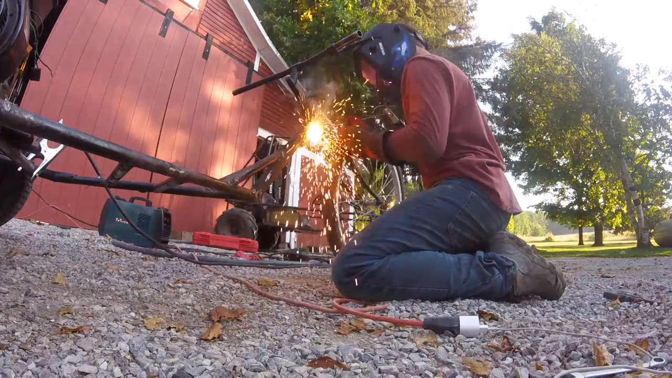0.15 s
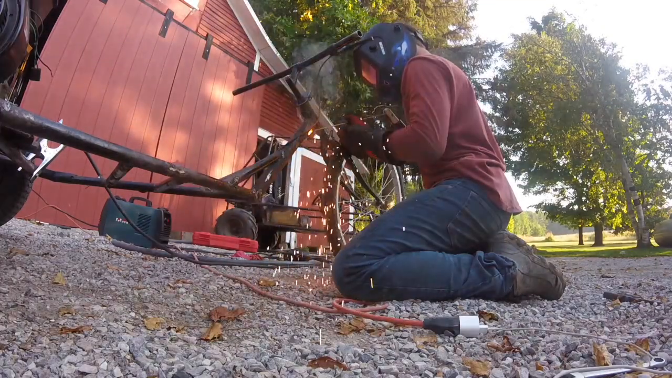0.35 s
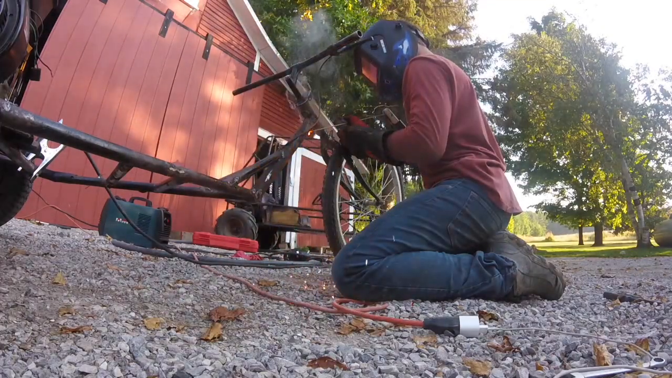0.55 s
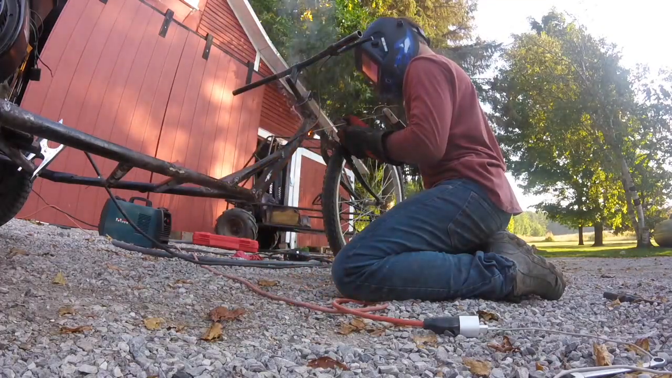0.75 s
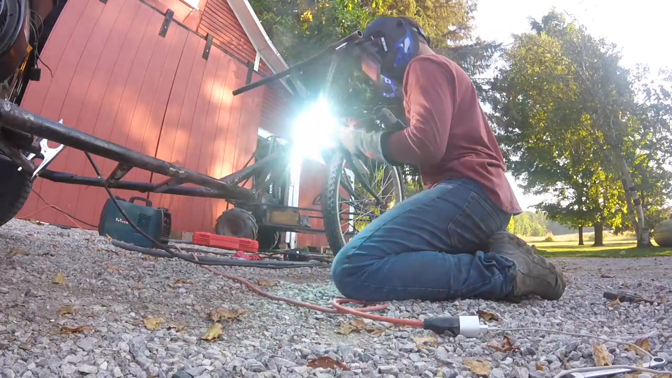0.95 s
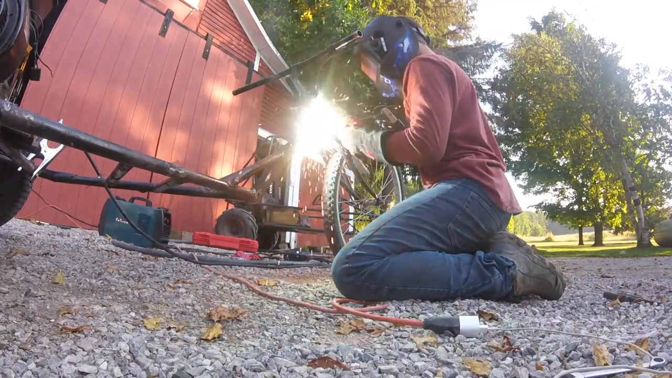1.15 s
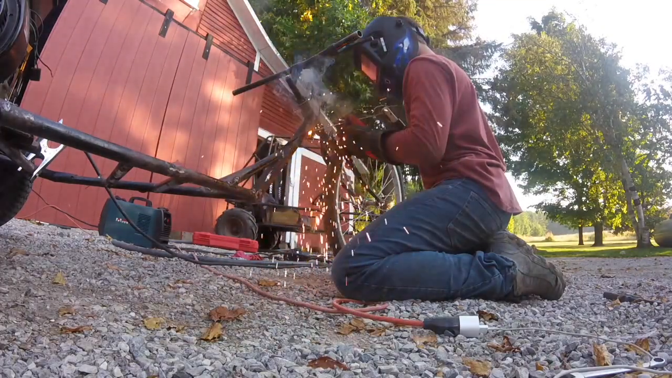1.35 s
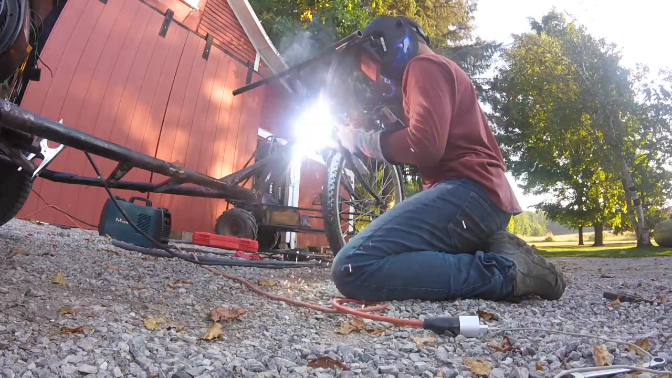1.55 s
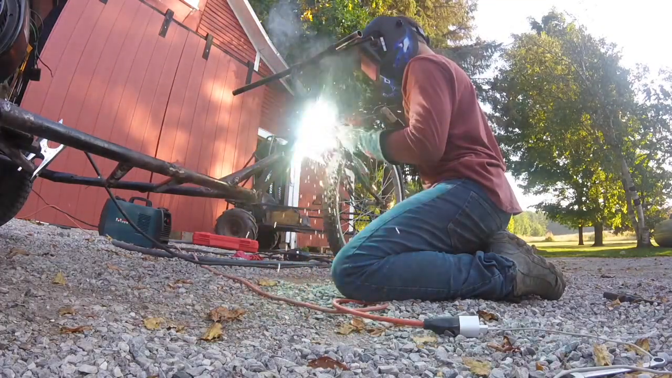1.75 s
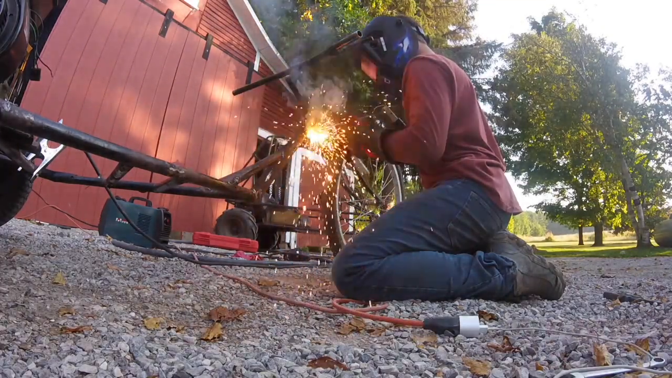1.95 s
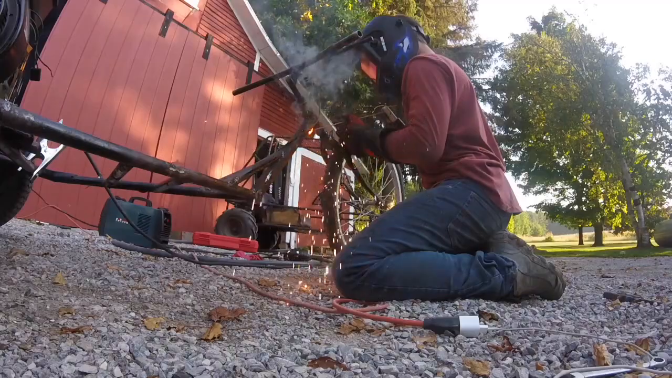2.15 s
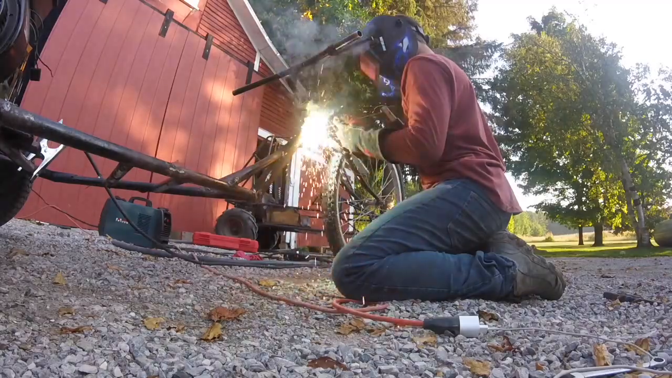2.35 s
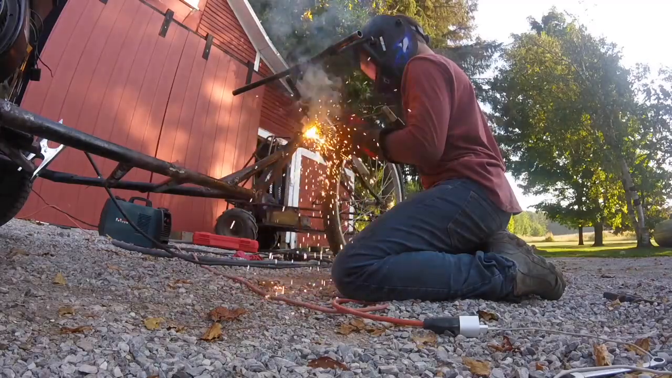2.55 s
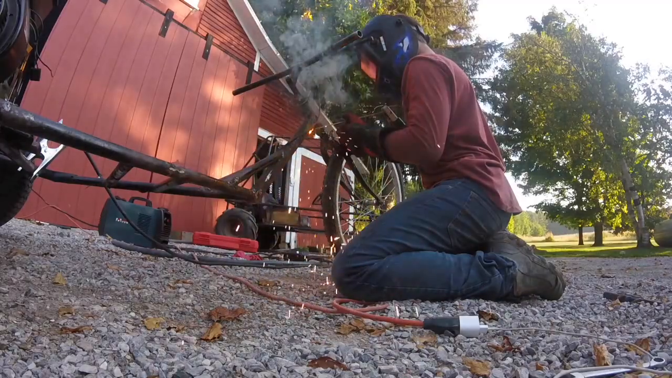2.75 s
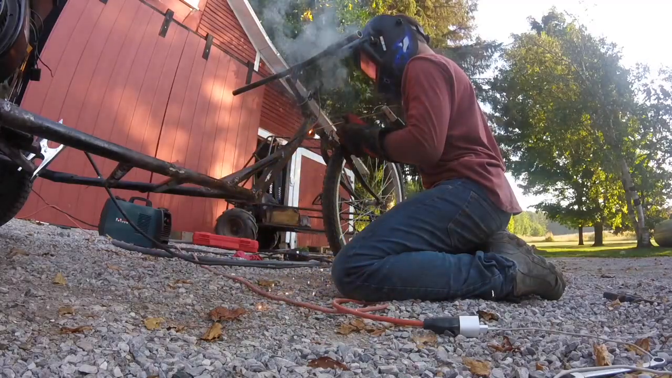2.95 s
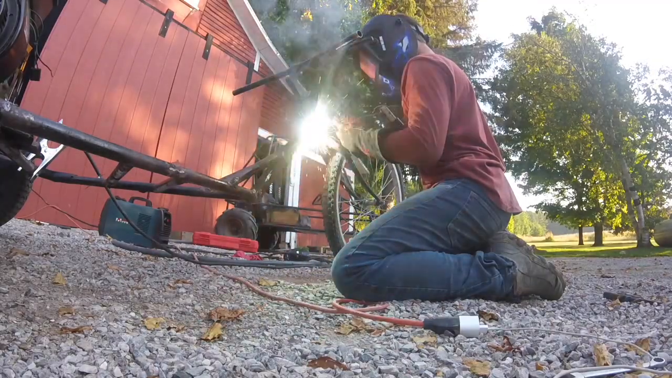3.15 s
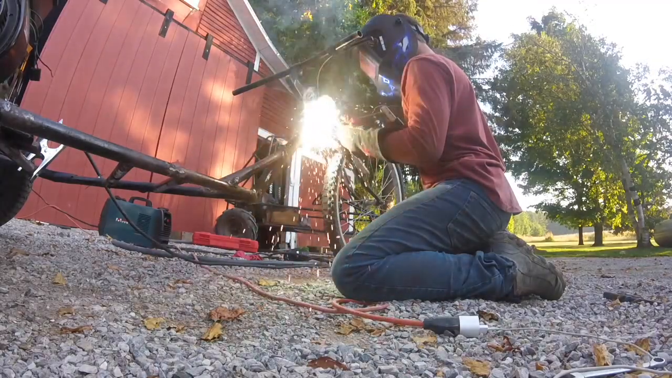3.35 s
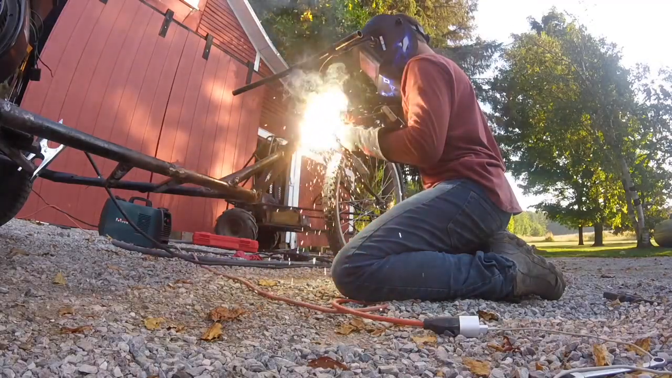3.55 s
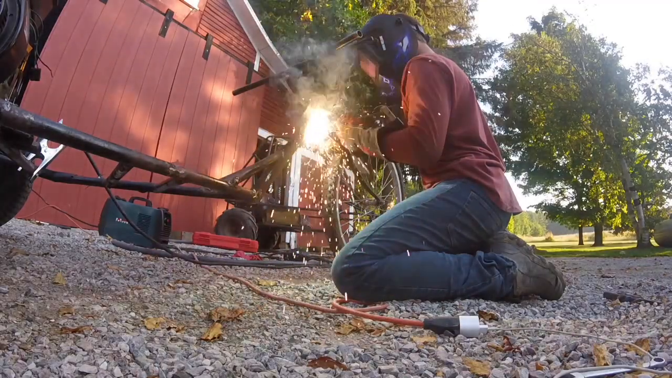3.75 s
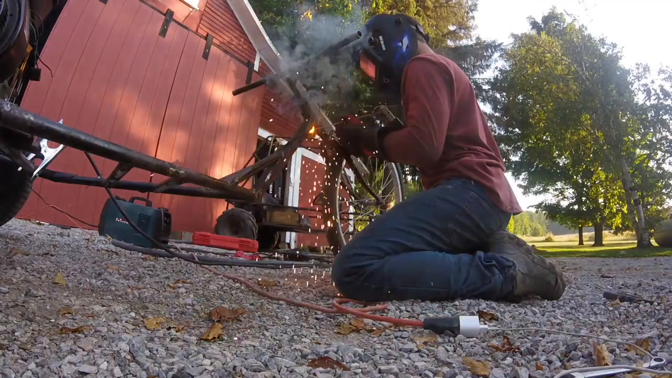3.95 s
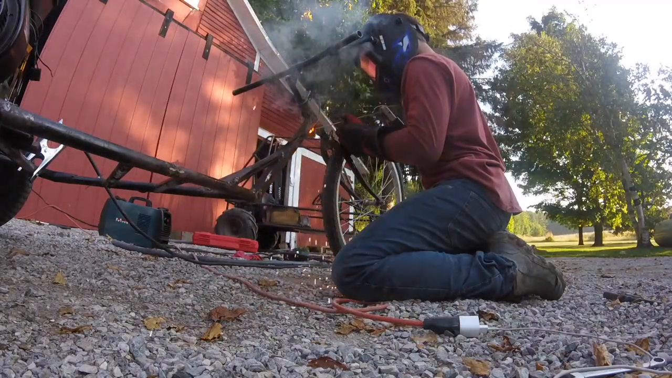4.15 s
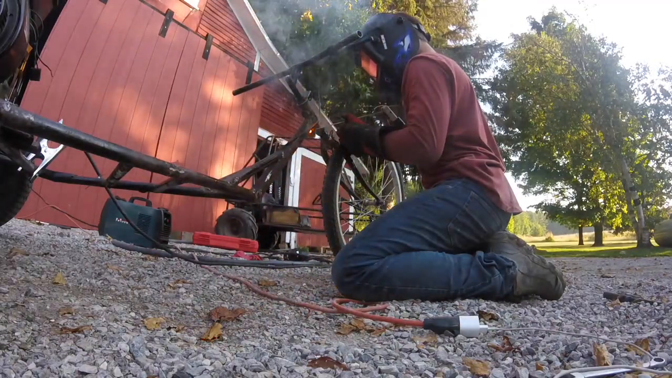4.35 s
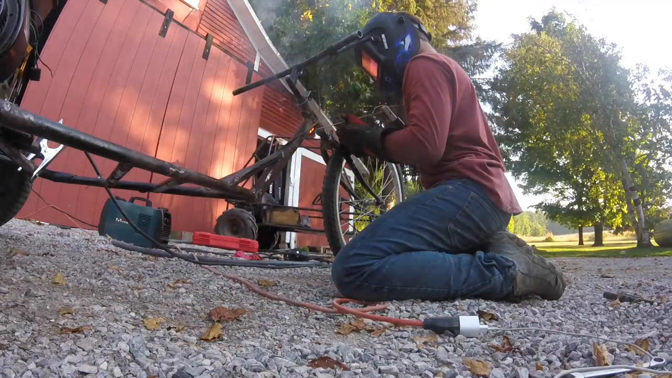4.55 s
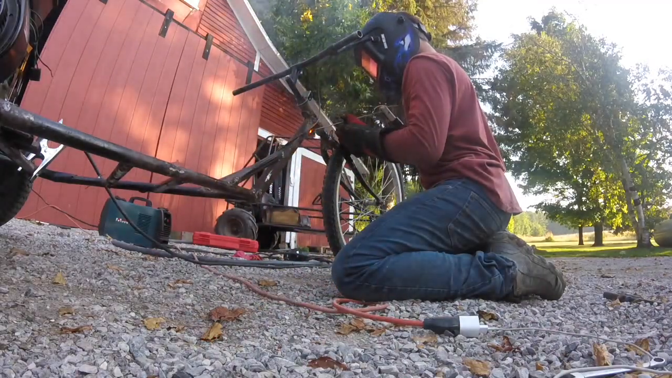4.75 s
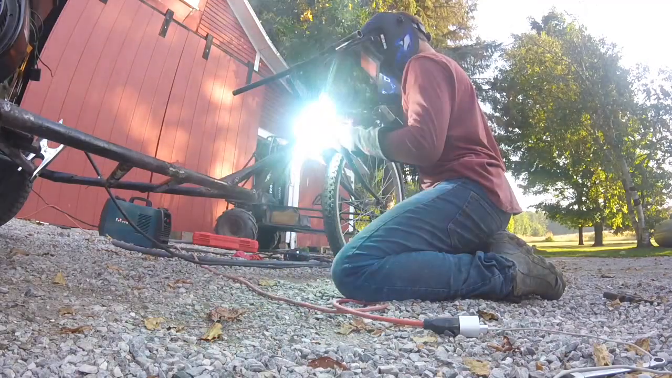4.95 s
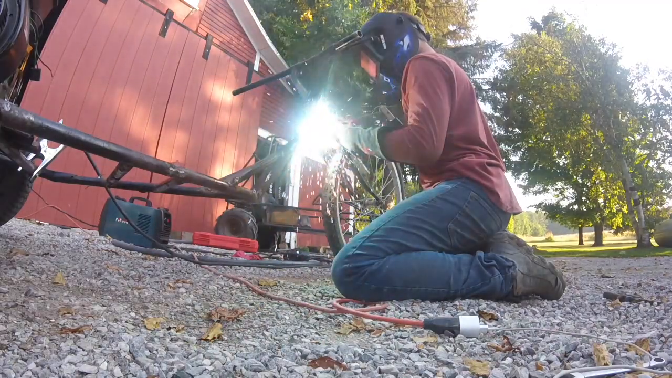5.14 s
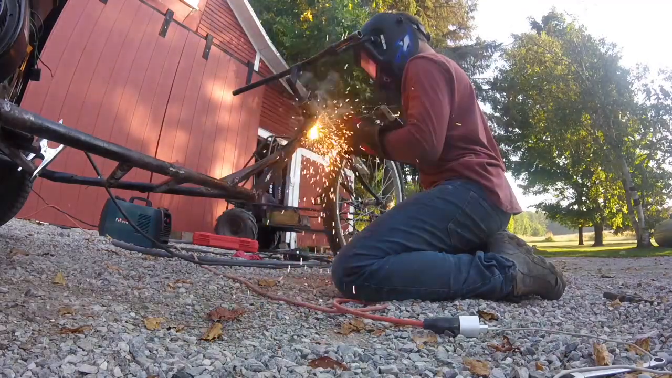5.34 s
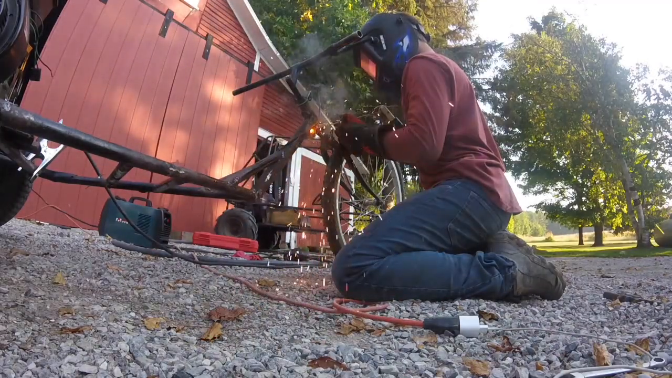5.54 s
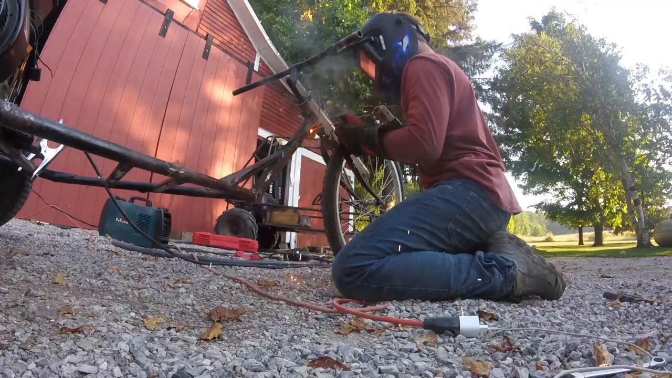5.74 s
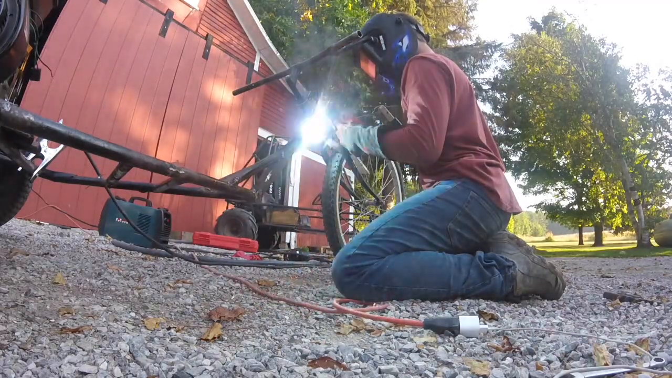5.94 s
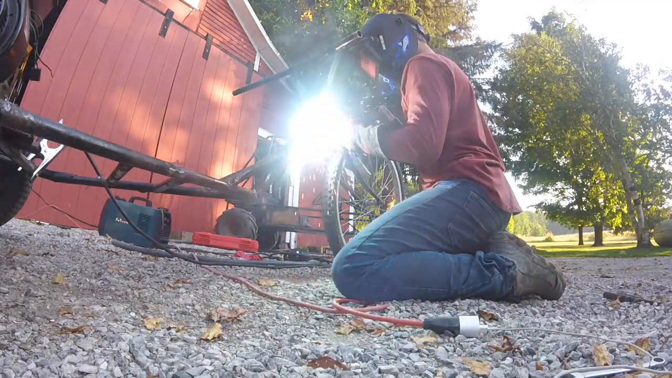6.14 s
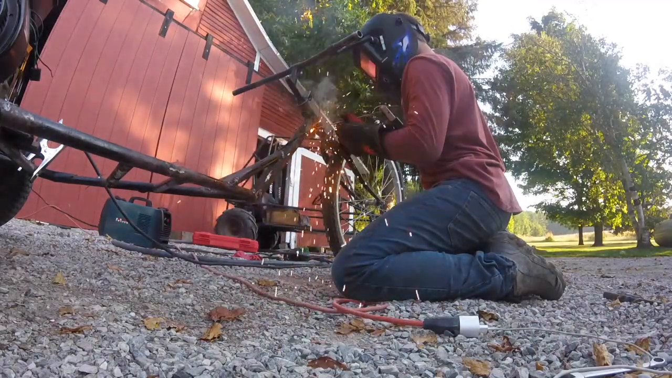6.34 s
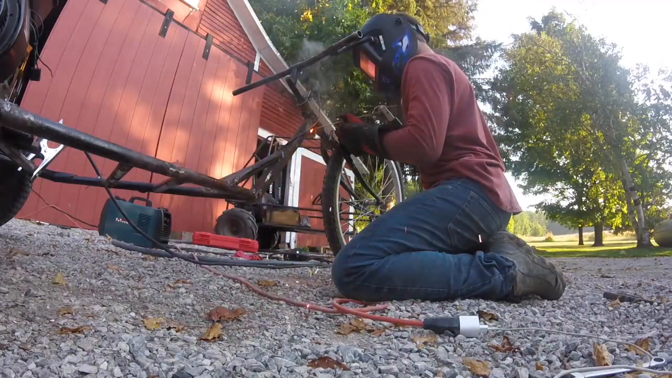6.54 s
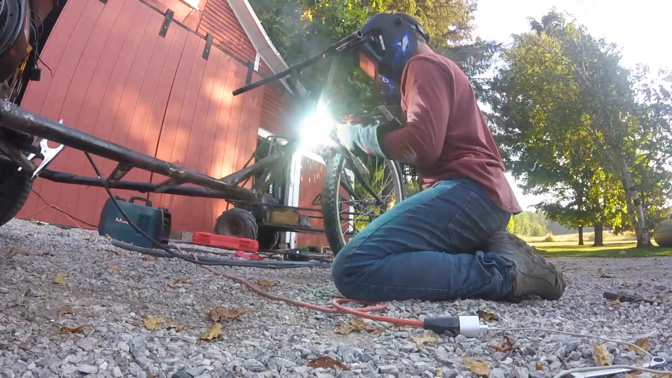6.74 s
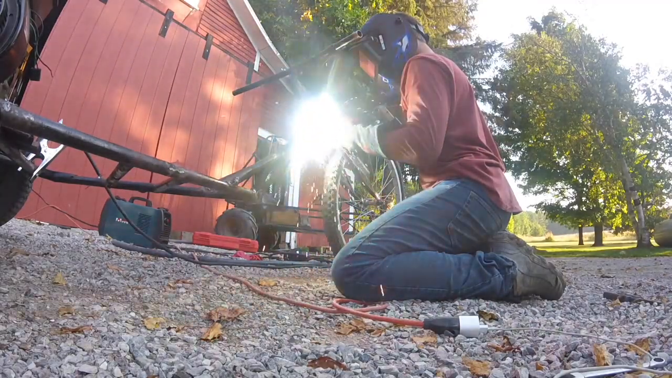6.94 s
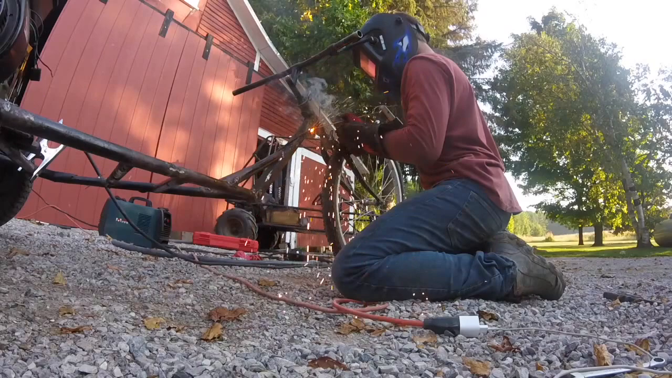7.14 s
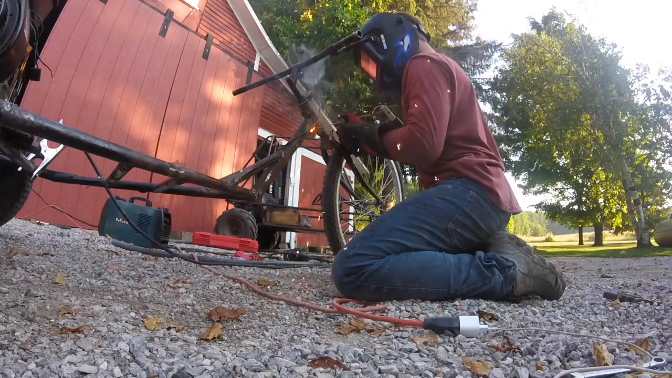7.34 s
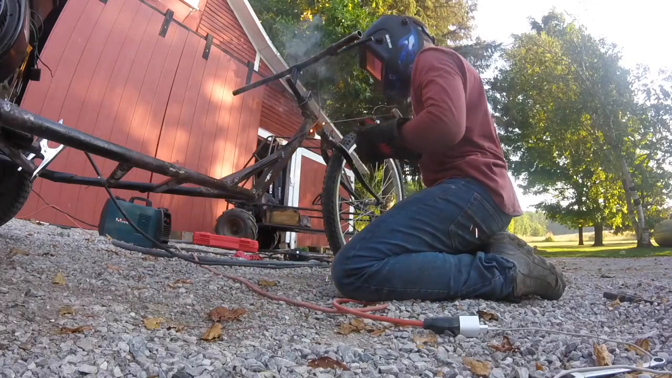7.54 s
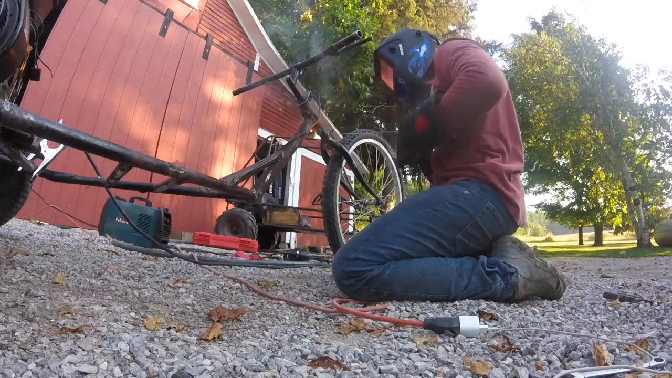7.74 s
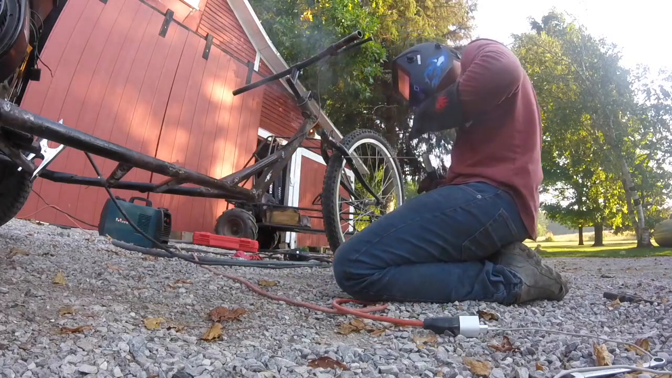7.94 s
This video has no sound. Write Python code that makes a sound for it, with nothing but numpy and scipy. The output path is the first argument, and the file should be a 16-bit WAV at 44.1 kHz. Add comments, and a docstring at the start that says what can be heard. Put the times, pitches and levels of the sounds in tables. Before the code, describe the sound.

Outdoors on gravel beside a shed, a wire welder stitches a steel frame a few metres from a small housed camera. A loud, flaring sputter is already burning at 0 s and stops near 0.25. Further bursts strike with a crack and thump at 1.0, 1.65, 2.3, 3.2, 5.0, 6.05 and 6.75 s, mostly 0.25 to 0.4 s long; the one at 3.2 is longest, about 0.7 s. Each begins brighter, then thickens into a rough 120-hertz buzz with sizzle, hum and irregular droplet pops, especially near its end, then cuts off sharply. Frying residue fades afterwards, with tiny gravel ticks around 1.4-1.6, 2.7, 5.5 and 6.3 s. The fan's low airy drone and wavering tones continue throughout. A faint high cicada buzz swells near 2.7 s and again from 5 s, slowing at the end; a fainter insect hiss fades early. Short diffuse reflections follow the weld.

```python
"""Gravel yard beside a shed and trees: a small housed camera lies a few metres from a wire welder at a steel frame.
Struck arcs crack with decaying noise, then sizzle, sputter and hum in step with the rectified mains.
Droplets pop as short blasts; after each stitch the bead fries and spatter ticks on the gravel.
The welder's fan drones throughout as flickering noise and wavering tones.
Faint in the trees, even clicks ring a cicada's tymbal, and a far insect is a narrow hiss that fades away."""
import sys
import numpy as np
from scipy import signal
from scipy.fft import rfft, irfft
from scipy.io import wavfile
from scipy.ndimage import uniform_filter1d

SR = 44100
rng = np.random.default_rng(int(sys.argv[2]) if len(sys.argv) > 2 else 0)


def unload_wav(signal):
    """Save mono or channel-first audio to the path in sys.argv[1] as 16-bit WAV at rate SR, clipped to [-1, 1]."""
    wavfile.write(
        sys.argv[1],
        SR,
        np.round(np.clip(np.atleast_2d(signal).T, -1, 1) * 32767).astype(np.int16),
    )


N = 352359  # samples


def undb(db):
    """Gain of a level in dB."""
    return 10 ** (np.asarray(db) / 20)


def unit(x):
    """Scale to rms 1."""
    return x / np.sqrt(np.mean(x ** 2))


def seconds():
    """Time of every sample in s."""
    return np.arange(N) / SR


def walk(rate_hz):
    """Random levels, a new one every 1 / rate_hz s, joined by slopes; spread near 1."""
    hold = int(SR / rate_hz)
    steps = np.repeat(rng.standard_normal(N // hold + 1), hold)
    return 1.2 * uniform_filter1d(steps, hold)[:N]


def curve(table, column=1):
    """One column of a table that starts with t/s, read at every sample."""
    columns = np.transpose(table)
    return np.interp(seconds(), columns[0], columns[column])


def ring(x, modes, tilt_db=0):
    """Resonances, each applied twice for steep skirts; neighbours swing in opposite phase; tilt in dB per octave."""
    out = 0
    for k, (hz, width_hz, db) in enumerate(modes):
        b, a = signal.iirpeak(hz, hz / width_hz, fs=SR)
        tone = signal.lfilter(b, a, signal.lfilter(b, a, x))
        out = out + (-1) ** k * undb(db + tilt_db * np.log2(hz / 4000)) * tone
    return out


def bursts(times, gains, decay_s):
    """Blasts of air: a suction spike that breaks up into quickly dying noise."""
    t = np.arange(600) / SR
    out = np.zeros(N + len(t))
    noises = rng.standard_normal((len(times), len(t)))
    for start_s, gain, noise in zip(times, gains, noises):
        i = int(start_s * SR)
        spike = -1.58 * np.exp(-t / 0.00011)
        out[i:i + len(t)] += gain * (noise + spike) * np.exp(-t / decay_s)
    return out[:N]


# Stitches laid on the frame; torch and arm shade each seam differently. Columns:
# strike t/s, crack level/dB, thump above crack/dB, length t/s, pool melts after t/s, flare/dB,
# sizzle on cold steel and on the pool/dB, sputter on cold steel and on the pool/dB,
# hum/dB, hum's octave/dB, treble tilt/dB per octave, tube ring/dB, frame ring/dB, hump/dB, last surge/dB
WELD_STITCHES = [ (-0.02, -15, -3, 0.262, 0.095, 23, -43, -40.5, -34.5, -35, -46.5, -39.5, 0.8, 3.5, 2, 3.5, 7.5),
                 (0.9937, -15, -7, 0.3, 0.21, 19.5, -44, -39, -42.5, -35, -48.5, -52, 2.5, 4, 7.5, 2.5, 1.5),
                 (1.6488, -11, -4, 0.37, 0.23, 10.5, -43.5, -36.5, -40, -31, -54, -43, 1.2, 2, -6.5, 2, -4),
                 (2.2973, -12.5, -6, 0.32, 0.024, 0, -41.5, -39.5, -35, -32, -64, -46, 1, 1.5, -4, 0.7, 3.5),
                 (3.1838, -11, -7, 0.72, 0.24, 2.1, -42, -39.5, -39.5, -28, -42, -44, 1.1, 4, -4.5, 0.2, -4.5),
                 (5.0016, -13.5, -3, 0.401, 0.19, -5.5, -44, -41, -35, -30, -59, -38.5, 2.2, 6, 1, -1, -1.5),
                 (6.0388, -19, 0, 0.24, 0.078, 5.5, -47, -41.5, -34.5, -29.5, -56, -37, 3.3, 8, 1.5, -1.2, -1),
                 (6.7676, -16, -3, 0.29, 0.1, 13, -46.5, -43, -39, -31, -63, -46, 4.3, 10.5, 3, -3, 4.5), ]
STITCH_COLUMNS = ("strike crack thump length melt flare cold_sizzle pool_sizzle cold_sputter pool_sputter "
                  "hum octave tilt tube frame hump surge").split()


def seam(name):
    """One column of the stitch table, held from each strike to the next."""
    rows = np.array(WELD_STITCHES)
    current = np.searchsorted(rows[:, 0], seconds(), "right") - 1
    return rows[np.maximum(current, 0), STITCH_COLUMNS.index(name)]


def molten():
    """Pool state: near 0 on cold steel, near 1 once the pool has formed."""
    takeover_s = 0.034
    since_melt = seconds() - seam("strike") - seam("melt")
    return (1 + np.tanh(since_melt / takeover_s / 2)) / 2


# How frame, ground and camera housing colour the treble: f/Hz, width of one pass/Hz, level/dB
TREBLE_MODES = [(1654, 157, -5.5), (2264, 455, 0.8), (2774, 252, -3), (3130, 530, 1.5), (3833, 510, 5.5),
                (4670, 2250, -6), (5470, 1400, 0), (6400, 1000, -7), (7270, 755, 0.5), (8150, 1900, -9.5),
                (10340, 640, -15.5), (11100, 970, -16.5), (12460, 550, -12.5), (14300, 1100, -21)]


def bright(x):
    """Treble of the weld, shaded seam by seam: tube modes, an even middle, a hump near 7 kHz, then the faint top."""
    cold_tilt_db = 2.2  # per octave: the arc is brighter on cold steel
    tilt_db = seam("tilt") + cold_tilt_db * (1 - molten())
    tube = undb(seam("tube")) * ring(x, TREBLE_MODES[:3], tilt_db)
    middle = ring(x, TREBLE_MODES[3:7], tilt_db)
    hump = undb(seam("hump")) * ring(x, TREBLE_MODES[7:9], tilt_db)
    top = ring(x, TREBLE_MODES[9:], tilt_db)
    return tube - middle - hump - top


# Boom, then two modes of the ringing frame: f/Hz, width of one pass/Hz, level/dB
BODY_MODES = [(254, 152, -8), (811.6, 136, 3.5), (1063, 220, 2.5)]


def dull(x):
    """Body of the weld: the bare puff, a boom and the ring of the frame, ending at a sharp edge."""
    puff_low_hz, body_top_hz = 175, 1068
    puff = signal.sosfilt(signal.butter(2, puff_low_hz, "high", fs=SR, output="sos"), x)
    boom = ring(x, BODY_MODES[:1])
    frame = undb(seam("frame")) * ring(x, BODY_MODES[1:2]) - ring(x, BODY_MODES[2:])
    edge = signal.cheby1(5, 1, body_top_hz, fs=SR, output="sos")
    return signal.sosfilt(edge, 0.69 * puff + boom + frame)


def burn():
    """Gains of sizzle, sputter, hum and octave: flare, cold start, molten pool, last surge, quick stop."""
    settle_s, flare_s, surge_s = 0.0034, 0.032, 0.017
    release_db_per_s, flare_sizzle_share = 1502, 0.24
    cold_hum_db, cold_octave_db, surge_hum_db = -28, -4, 5.5
    age = seconds() - seam("strike")
    left = seam("length") - age
    pool = molten()
    cold = 1 - pool
    # the arc stretches as the torch lets go
    surge = np.exp(-abs(left) / surge_s)
    swell_db = seam("flare") * np.exp(-age / flare_s) + seam("surge") * surge
    on = np.clip(age / settle_s, 0, 1) * undb(release_db_per_s * np.clip(left, -1, 0))
    sizzle_db = cold * seam("cold_sizzle") + pool * seam("pool_sizzle") + flare_sizzle_share * swell_db
    sputter_db = cold * seam("cold_sputter") + pool * seam("pool_sputter") + swell_db + 2 * walk(25)
    hum_db = seam("hum") + cold * cold_hum_db + swell_db + surge_hum_db * surge
    octave_db = seam("octave") + cold * cold_octave_db + swell_db
    return on * undb([sizzle_db, sputter_db, hum_db, octave_db])


def arc():
    """Burning arc: noise and kicks pulse with the rectified mains, over a hum at its ripple and the octave."""
    ripple_hz, spits_per_s = 120, 500
    t = seconds()
    sizzle, sputter, hum, octave = burn()
    turns = ripple_hz * t + 0.061 * walk(60)
    cycle = np.maximum.accumulate(np.clip(turns, 0, None).astype(int))
    # every half-wave of current burns with its own strength
    hiss_strength, kick_strength = rng.standard_normal((cycle.max() + 1, 2))[cycle].T
    puff = np.exp(-(turns % 1) / 0.75)
    grit = undb(2.33 * rng.exponential(size=N)) * rng.standard_normal(N)
    # small droplets spit at random between the half-waves
    spit = -1.0 * (rng.random(N) < spits_per_s / SR) * undb(3.2 * rng.standard_normal(N))
    pulsed_grit = (0.75 + puff * undb(3.9 * hiss_strength)) * grit
    hiss = unit(bright(pulsed_grit)) + 0.61 * unit(bright(spit))
    kick = -1.0 * np.diff(cycle, prepend=0) * undb(1.56 * kick_strength)
    body = unit(dull(kick + 0.55 * spit)) + 0.45 * unit(dull(grit))
    tones = hum * np.sin(2 * np.pi * ripple_hz * t)
    tones = tones + octave * np.sin(4 * np.pi * ripple_hz * t + 1)
    return sizzle * unit(hiss) + sputter * unit(body) + tones


# Colour of the fan's rushing air: f/Hz, relative level/dB per Hz
FAN_AIR_COLOUR = [(20, -1), (150, -12), (250, -9), (295, -2), (350, -10.5), (600, -5), (880, -4),
                  (1150, -12.5), (1500, -25.5), (2300, -35.5), (4400, -39.5), (8000, -45.5), (12000, -57),
                  (14000, -64)]
# Blade tones: f/Hz, level/dB rms about which each wavers
FAN_TONES = [(290.7, -60.5), (436.0, -54.5), (812.9, -84), (877.5, -56), (1044, -60)]


def fan():
    """Welder's fan: rushing air that flickers band by band, and wavering blade tones."""
    air_db, flicker_db = -44, 1.1
    hz_points, db_points = np.transpose(FAN_AIR_COLOUR)
    f = np.maximum(np.fft.rfftfreq(N, 1 / SR), 1)
    colour = undb(np.interp(np.log(f), np.log(hz_points), db_points))
    air = 0
    for octave in np.arange(4, 15):  # bands centred on 2 ** octave Hz
        share = np.sqrt(np.clip(1 - abs(np.log2(f) - octave), 0, 1))
        band = irfft(rfft(rng.standard_normal(N)) * colour * share, N)
        air = air + undb(flicker_db * walk(9)) * band
    # all tones share one wavering speed
    turns = np.cumsum(1 + 0.00374 * walk(8)) / SR
    tones = 0
    for hz, db in FAN_TONES:
        tones = tones + np.sqrt(2) * undb(db + 1.54 * walk(11)) * np.sin(2 * np.pi * hz * turns)
    return undb(air_db) * unit(air) + tones


# Cicada's song: t/s, level/dB of the sharp resonance, of its broad neighbour, of the upper resonances
CICADA_SONG = [(1.6, -95, -95, -95), (2.1, -78, -89, -88), (2.7, -66.5, -78, -77), (3.1, -76, -86, -86),
               (4.2, -80, -88, -82), (4.9, -71, -85, -84), (5.6, -71.5, -79, -84), (6.5, -81, -75.5, -83),
               (7.2, -76, -70.5, -73), (7.55, -78, -74, -74), (7.99, -74, -74, -81)]
# Tymbal resonances, sharp, broad, then upper: f/Hz, width of one pass/Hz, level within its group/dB
TYMBAL_MODES = [(5790, 140, 0), (5740, 700, 0), (6350, 300, -3), (6850, 300, -6), (7500, 450, 0),
                (8720, 450, -5)]


def insects():
    """Even clicks ring a cicada's tymbal and slow as its song ends; trees smear it; a far insect hisses."""
    click_hz, fastest_s, sag_hz_per_s2 = 200.15, 3, 0.32
    wind_down_s, wind_down_hz_per_s = 7.5, 19
    steady_waver, tired_waver, tires_s = 0.00027, 0.00236, 6.1  # shares of the click rate; rougher late
    far_db, far_fade_db_per_s2 = -79, 2
    now = seconds()
    hz = click_hz - sag_hz_per_s2 * (now - fastest_s) ** 2
    hz = hz - wind_down_hz_per_s * np.maximum(now - wind_down_s, 0)
    waver = np.where(now < tires_s, steady_waver, tired_waver) * walk(25)
    turns = np.cumsum(hz * (1 + waver)) / SR
    # only the harmonics near the tymbal's pitches
    clicks = sum(undb(1.6 * walk(14)) * np.cos(2 * np.pi * k * turns) for k in range(26, 48))
    t = np.arange(SR // 2) / SR
    trees = rng.standard_normal(len(t)) * undb(-60 * t / 0.8)
    clicks = clicks + 0.3 * signal.fftconvolve(clicks, trees / np.linalg.norm(trees))[:N]
    song = 0
    for column, modes in enumerate([TYMBAL_MODES[:1], TYMBAL_MODES[1:2], TYMBAL_MODES[2:]], start=1):
        song = song + undb(curve(CICADA_SONG, column)) * unit(ring(clicks, modes))
    # far off, blurred to a hiss
    far = unit(ring(rng.standard_normal(N), [(6400, 810, 0)]))
    return song + undb(far_db - far_fade_db_per_s2 * now ** 2) * far


def blows(table, decay_s):
    """Cracks and their duller, longer thumps, coloured like the weld."""
    crack_trim_db, thump_trim_db = -1, 5
    times, crack_db, thump_db = np.transpose(table)
    crack = uniform_filter1d(bursts(times, undb(crack_db), decay_s), size=3)
    thump = bursts(times, undb(crack_db + thump_db), 2 * decay_s)
    return undb(crack_trim_db) * bright(crack) + undb(thump_trim_db) * dull(thump)


# Droplets, before trim and colouring: t/s, crack level/dB, thump above crack/dB
DROPLET_POPS = [(0.1466, -23, 3.8), (0.2306, -21.5, -9), (0.014, -21, 7), (1.0039, -14, 2),
                (1.0068, -28, 6), (1.1583, -26, 3.5), (1.2286, -22, -3), (1.292, -30, 7),
                (1.7459, -25, 7.5), (1.881, -20, -1.1), (1.953, -26, 7), (2.026, -21.5, 10),
                (2.6121, -25.5, 8.5), (3.255, -25, 3), (3.3862, -26, -9), (3.4221, -19, -1),
                (3.5974, -20, -4), (3.6865, -27, 3), (3.7651, -24, 8), (3.7963, -26, 12.5),
                (3.8199, -29, 7), (3.8791, -21.5, 11.5), (5.1294, -31, 11), (5.174, -24, 0),
                (5.255, -25, 7.5), (5.2993, -22.5, -8), (5.3168, -30, 4), (5.3376, -18, 5),
                (5.3808, -19, 0), (6.162, -30, 8), (6.264, -29, 14), (6.277, -30, 8), (6.843, -54, 3),
                (6.9391, -25.5, 14), (6.98, -26, 12), (7.0235, -22.5, 15)]


def pops():
    """Droplets short the arc and blow off in small blasts."""
    return blows(DROPLET_POPS, decay_s=0.00062)


# Spatter landing on the gravel, before a shared cut and colouring: t/s, level/dB
GRAVEL_SPATTER = [(1.3798, -44), (1.4097, -38), (1.4775, -43), (1.519, -36.5), (1.5624, -42), (2.2727, -45),
                  (2.6798, -44.5), (5.5094, -45), (5.5568, -43), (6.3445, -43), (7.9104, -54)]


def cooling():
    """After each stitch the bead fries on and sparks patter down, dying away; spatter ticks on the gravel."""
    fry_db, spatter_cut_db = -67, -12
    t = seconds()
    heat = 0
    for strike_s, _, _, length_s, *_ in WELD_STITCHES:
        since_end = t - strike_s - length_s
        heat = heat + (since_end > 0) * np.exp(-abs(since_end) / 0.3)
    patter = undb(3.4 * rng.exponential(size=N)) * rng.standard_normal(N) * undb(0.83 * walk(66))
    times, db = np.transpose(GRAVEL_SPATTER)
    ticks = ring(bursts(times, undb(db), 0.0042), TREBLE_MODES)
    return undb(fry_db) * heat * unit(ring(patter, TREBLE_MODES)) + undb(spatter_cut_db) * ticks


def strikes():
    """Crack and thump as the wire strikes; a stitch already burning at the start has none."""
    return blows([row[:3] for row in WELD_STITCHES if row[0] >= 0], decay_s=0.0005)


def yard(x):
    """Shed wall and trees send back a short, diffuse tail."""
    tail_db = -19
    t = np.arange(int(SR / 4)) / SR
    tail = rng.standard_normal(len(t)) * undb(-60 * t / 0.24) * (t > 0.004)
    return x + undb(tail_db) * signal.fftconvolve(x, tail / np.linalg.norm(tail))[:N]


# Cancellations in the camera housing: f/Hz, width/Hz
HOUSING_NOTCHES = [(1430, 198), (1950, 130), (4420, 150), (6150, 330), (9350, 390)]


def housing(x):
    """Sound from the weld reaches the capsule by several paths that cancel at a few pitches."""
    for hz, width_hz in HOUSING_NOTCHES:
        b, a = signal.iirnotch(hz, hz / width_hz, fs=SR)
        x = signal.lfilter(b, a, x)
    return x


def scene():
    """Everything at the camera: the weld through yard and housing, the fan and the insects direct."""
    weld = arc() + pops() + cooling() + strikes()
    return (housing(yard(weld)) + fan() + insects())[None]


def record(dry):
    """The camera cuts the top, steeply above 15.5 kHz."""
    return signal.sosfilt(signal.ellip(8, 0.2, 70, 15500, fs=SR, output="sos"), dry)


dry = scene()
out = record(dry)
unload_wav(out)
```